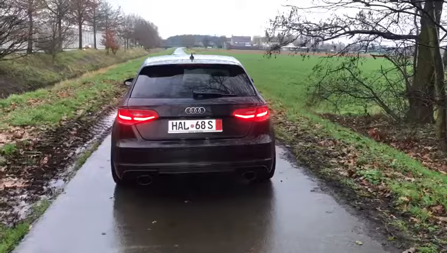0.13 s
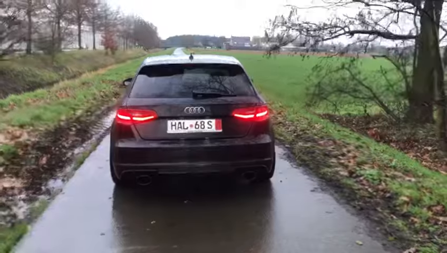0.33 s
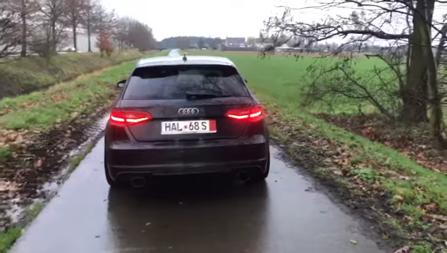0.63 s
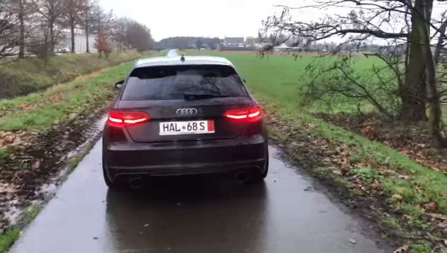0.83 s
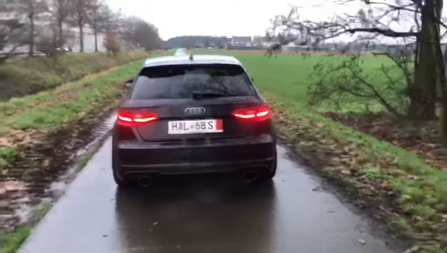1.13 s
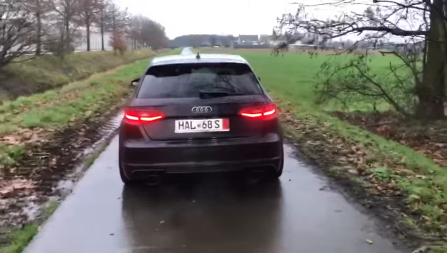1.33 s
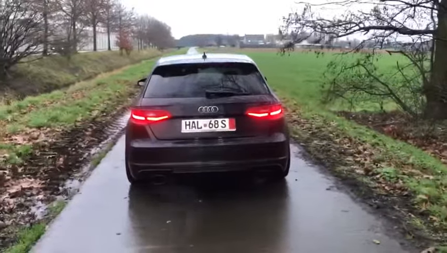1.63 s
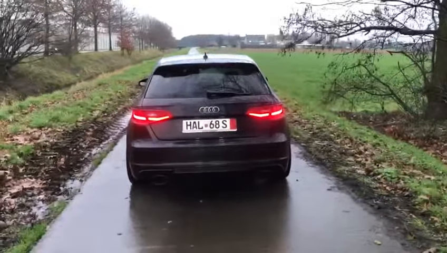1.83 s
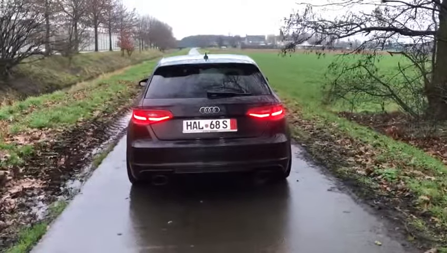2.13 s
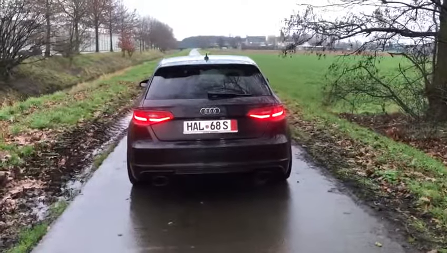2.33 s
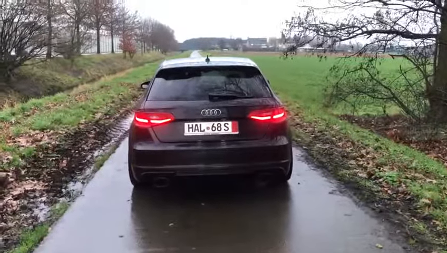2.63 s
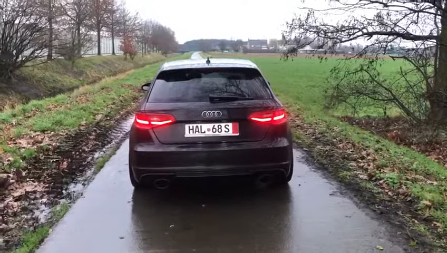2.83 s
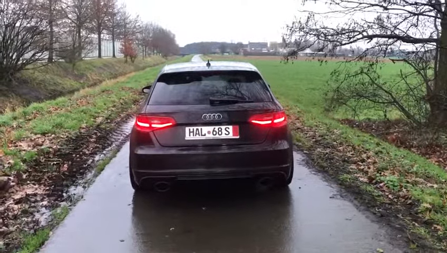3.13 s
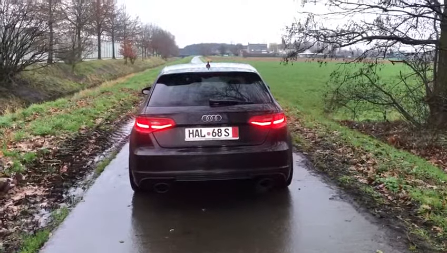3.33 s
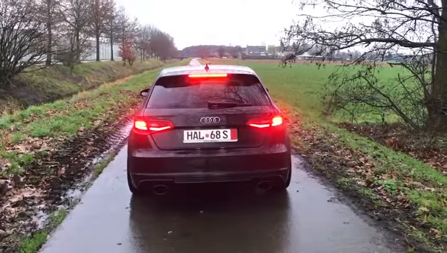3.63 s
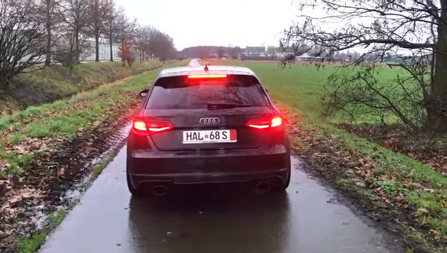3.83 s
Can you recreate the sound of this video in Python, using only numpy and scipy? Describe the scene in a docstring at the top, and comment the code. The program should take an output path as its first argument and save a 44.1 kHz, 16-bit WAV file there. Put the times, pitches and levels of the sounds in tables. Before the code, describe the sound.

A four-cylinder car with a sports exhaust idles softly, then revs three times, each higher blip ending in pops; the revs sink with a drone. Open wet lane, microphone a few metres behind.

```python
"""A four-cylinder car with a sports exhaust idles, then is blipped three times, heard from behind on an open lane.
Each firing drives the exhaust: a deep boom, a throaty body, a bark and, on throttle, rasping gas and sizzle
in the ringing tailpipes. Mostly around the top of each blip the exhaust pops; a tone drones as the revs sink.
Behind it are scattered echoes, an airy engine hiss, one faint tick and steady outdoor noise.
All of it is made from timed pulses, filtered noise and one sine."""
import sys
import numpy as np
from scipy import signal
from scipy.fft import rfft, irfft
from scipy.io import wavfile

SR = 44100
rng = np.random.default_rng(int(sys.argv[2]) if len(sys.argv) > 2 else 0)


def persist_wave(psi):
    """Save psi, clipped to +-1, as 16-bit WAV."""
    counts = np.round(np.clip(psi, -1, 1) * 32767).astype(np.int16)
    wavfile.write(sys.argv[1], SR, np.atleast_2d(counts).T)


N = 176400
TIME = np.arange(N) / SR  # seconds


def undb(db):
    """Turn decibels into gain."""
    return 10 ** (np.asarray(db) / 20)


def curve(rows):
    """Join the (seconds, value) rows of a control by straight lines."""
    return np.interp(TIME, *np.array(rows).T)


def unit(x):
    """Scale to rms 1."""
    return x / np.sqrt(np.mean(x ** 2))


def colour(x, tone, rings=(), size=16384):
    """Filter through (Hz, dB) points with optional resonant peaks, with no sound ahead of its cause."""
    f = np.maximum(np.arange(size // 2 + 1) * SR / size, 1)
    hz, db = np.array(tone).T
    gain_db = np.interp(np.log(f), np.log(hz), db)
    # beyond the end points the response falls further
    above = np.maximum(np.log(f / hz[-1]), 0)
    below = np.minimum(np.maximum(np.log(hz[0] / f), 0), 1)
    gain_db -= 20 * (above + below)
    for centre, width, peak_db in rings:
        gain_db += peak_db / (1 + (2 * (f - centre) / width) ** 2)
    # folding the cepstrum gives the minimum-phase response
    cepstrum = irfft(np.log(undb(gain_db)))
    cepstrum[1:size // 2] *= 2
    cepstrum[size // 2 + 1:] = 0
    response = irfft(np.exp(rfft(cepstrum)))
    return signal.fftconvolve(x, response)[:N]


def clicks(times, sizes, count=8):
    """Place band-limited impulses at exact times, even between samples."""
    at = times[:, None] * SR
    index = np.floor(at).astype(int) + np.arange(1 - count, count + 1)
    shape = np.sinc(index - at) * np.sinc((index - at) / count)
    return np.bincount(np.clip(index, 0, N).ravel(), (sizes[:, None] * shape).ravel(), N + 1)[:N]


def even(x, phase):
    """Hold rms near 1 over every few firings, so that a level curve sets the loudness."""
    samples = np.arange(N)
    hi = np.interp(phase + 1, phase, samples)
    lo = np.interp(phase - 1, phase, samples)
    power = x ** 2
    for _ in range(2):
        total = np.cumsum(power)
        power = (np.interp(hi, samples, total) - np.interp(lo, samples, total)) / (hi - lo)
    return x / np.sqrt(power + 1e-18)


# Engine speed. Each row: time in seconds, firings per second.
SPEED = [(0.0, 23.0), (0.36, 23.36), (0.47, 20.69), (0.64, 29.45), (0.73, 38.06), (0.8, 49.71),
         (0.92, 67.43), (0.97, 66.5), (1.0, 64.9), (1.23, 60), (1.348, 63.5), (1.468, 77.6), (1.626, 103.6),
         (1.78, 131.5), (1.848, 136.6), (1.9, 132.8), (2.42, 113.8), (2.52, 117.5), (2.608, 123.3),
         (2.68, 130.7), (2.78, 134), (3, 127.4), (3.5, 110.3), (3.75, 101.4), (4, 93.8)]
# How far the throttle is open. Each row: time in seconds, opening from 0 to 1.
THROTTLE = [(.57, 0.14), (.61, 0.96), (.95, 0.68), (1.0, 0.1), (1.3, 0.1), (1.45, 0.66), (1.82, 1),
            (1.89, 0), (2.54, .05), (2.68, 1), (2.86, 0.64), (3.02, 0.2)]
FIRST_PHASE = .678  # firings already counted at the start


def engine():
    """Add up the engine speed into a running count of firings, and follow the throttle."""
    hz, throttle = curve(SPEED), curve(THROTTLE).clip(0, 1)
    phase = FIRST_PHASE + np.cumsum(hz) / SR
    return hz, throttle, phase


# Strength of each cylinder in the boom. One value per cylinder, in dB.
CYLINDERS_LOW_DB = [.3, 0.091, .2, -0.042]
# Strength of each cylinder in the high pulses at full throttle. One value per cylinder, in dB.
CYLINDERS_HIGH_DB = [1.5, -0.053, 2.9, -2.5]
# Unequal pipe runs shift the high pulses, at full throttle. One delay per cylinder, in seconds.
STAGGER_S = [.00018, -.00012, .00005, -.00016]
# How raggedly the cylinders fire, roughest in the burbles around the top of each blip.
# Each row: time in seconds, amount from 0 to 1.
RAGGED = [(.95, 0.03), (.98, 1), (1.3, 0.58), (1.4, 0.2), (1.82, 0), (1.845, 1), (1.875, 0.2), (2.72, 0.32),
          (2.75, 1), (2.88, 1), (2.98, 0.64), (3.03, 0.46)]
RAGGED_DB, RAGGED_S = 3.5, .0003  # random spread at amount 1: boom level, timing
SCATTER_DB, JITTER_S = 1, .00002  # base spread of level and timing, scaled by throttle below
COAST_LIMP_DB, LIMP_ABOVE_HZ = 15, 96  # off-throttle drop of every other high pulse, above this firing rate


def firings(hz, throttle, phase):
    """Each cylinder fires in turn; load and coasting make the low, middle and high pulses uneven."""
    number = np.arange(1, int(phase[-1]) + 1)
    times, cylinder = np.interp(number, phase, TIME), number % len(STAGGER_S)
    load = np.interp(times, TIME, throttle)
    fast = np.interp(times, TIME, curve(RAGGED).clip(0, 1))
    ragged = fast
    jitter, scatter, ragged_time, ragged_level = rng.standard_normal((len(times), 4)).T
    times = times + JITTER_S * jitter * (1 + 2 * load) + RAGGED_S * ragged * ragged_time
    fast = np.interp(times, TIME, hz) > LIMP_ABOVE_HZ

    scatter_db = SCATTER_DB * scatter * (0.14 + load)
    stagger = np.array(STAGGER_S)[cylinder] * load
    low_db = np.array(CYLINDERS_LOW_DB)[cylinder] + scatter_db + RAGGED_DB * ragged * ragged_level
    uneven_db = np.array(CYLINDERS_HIGH_DB)[cylinder] * load + 2 * scatter_db
    # weakening every other pulse gives half-order lines
    limp_db = COAST_LIMP_DB * (1 - load) * (number % 2) * fast
    low = clicks(times + 0.68 * stagger, undb(low_db))
    middle = clicks(times + 0.1 * stagger, undb(.5 * uneven_db - .35 * limp_db))
    high = clicks(times + stagger, undb(uneven_db - limp_db))
    return low, middle, high


PUFF_S, PUFF_RISE_S = 0.0048, 0.0005  # time constants of a puff's decay and rise
PUFF_DEPTH = 0.95  # swing of the gas at full throttle, 0-1


def gas_puffs(high, throttle):
    """Each firing pushes a puff of gas that rises fast and dies away; open throttle deepens the swing."""
    age = TIME[:SR // 20]
    shape = np.exp(-age / PUFF_S) * (1 - np.exp(-age / PUFF_RISE_S))
    puff = signal.fftconvolve(high, shape)[:N]
    depth = PUFF_DEPTH * throttle ** 0.45
    return 1 - depth + depth * puff


def gas(gate, phase, tone, rings=()):
    """Turbulent gas: noise that surges with each firing, coloured by the exhaust."""
    return even(colour(gate * rng.standard_normal(N), tone, rings), phase)


def region(pulses, flow, tone, gas_db, rings=()):
    """One region of the exhaust: pressure pulses and turbulent gas pass through the same response."""
    gate, throttle, phase = flow
    share = undb(np.interp(throttle, [0, 1], gas_db))  # gas against pulses
    tonal = even(colour(pulses, tone, rings), phase)
    return (tonal + share * gas(gate, phase, tone, rings)) / np.hypot(1, share)


# Response of the boom. Each row: frequency in Hz, relative gain in dB.
BOOM_TONE = [(25, -38.5), (55, -13.5), (80, -1.5), (100, 7), (120, 11.5), (138, 0), (165, 1), (200, -27.5),
             (260, -46.5)]
# Loudness of the boom. Each row: time in seconds, level in dB.
BOOM = [(0, -34.5), (.25, -31.5), (.38, -39), (.415, -30), (.47, -38), (.53, -35), (.59, -29.5),
        (.69, -16.5), (.9, -9), (.98, -11), (1.04, -16), (1.1, -13), (1.23, -10), (1.32, -19),
        (1.44, -18.5), (1.55, -12.5), (1.68, -13.5), (1.78, -7), (1.83, -9.5), (1.853, -23), (1.878, -4.5),
        (1.95, -7.5), (2.03, -6.5), (2.38, -9.5), (2.43, -16), (2.51, -11.5), (2.61, -24.5), (2.68, -14),
        (2.72, -9), (2.755, -35.5), (2.81, -14), (2.92, -18.5), (2.97, -28), (3.01, -11.5), (3.07, -14),
        (3.2, -10), (3.45, -10.5), (3.66, -17), (4, -17)]


def boom(low, flow):
    """The low pulses drive the deepest region, with only a little gas."""
    return region(low, flow, BOOM_TONE, gas_db=(-36, -24)) * undb(curve(BOOM))


# Response of the throaty body. Each row: frequency in Hz, relative gain in dB.
BODY_TONE = [(120, -37.5), (165, -3), (200, 4), (245, 8), (285, 4.5), (335, 9), (385, 2), (440, -16.5),
             (560, -31.5)]
# Gas against the pulses in the body: dB off throttle, then dB at full throttle.
BODY_GAS_DB = (-11, -17)
# Loudness of the body. Each row: time in seconds, level in dB.
BODY = [(0, -43.5), (.3, -45), (.38, -47), (.41, -42), (.48, -51), (.59, -45), (.62, -32), (.67, -23),
        (.9, -16), (.96, -29), (1.02, -30.5), (1.21, -27.5), (1.25, -18.5), (1.32, -27), (1.4, -17.5),
        (1.49, -12), (1.56, -15), (1.63, -10), (1.72, -8.5), (1.82, -17), (1.88, -25), (1.97, -24),
        (2.15, -36.5), (2.35, -31.5), (2.44, -24.5), (2.52, -30.5), (2.61, -20.5), (2.71, -20),
        (2.78, -22.5), (2.95, -30.5), (3.08, -30), (3.33, -32), (3.5, -25.5), (3.72, -34), (4, -22)]


def body(middle, flow):
    """The middle pulses and some gas sound through the region above the boom."""
    return region(middle, flow, BODY_TONE, BODY_GAS_DB) * undb(curve(BODY))


# Reflections inside the silencer. Each row: delay in seconds, gain as a plain factor.
BOUNCES = [(0, 0.79), (.0035, 0.71), (.0069, .5), (.0108, 0.4)]
# Response of the bark. Each row: frequency in Hz, relative gain in dB.
BARK_TONE = [(330, -36), (440, -8), (520, 4), (570, -4), (630, 0.5), (740, 0.5), (840, -14.5), (900, -15.5),
             (1000, -42), (1500, -56)]
# Resonances of the silencer. Each row: centre in Hz, width in Hz, added peak in dB.
BARK_RINGS = [(565, 28, 4.3), (722, 68, 4), (909, 13, 17)]
# Gas against the pulses in the bark: dB off throttle, then dB at full throttle.
BARK_GAS_DB = (-9, -5)
# Loudness of the bark. Each row: time in seconds, level in dB.
BARK = [(0, -59), (.59, -59), (.67, -36.5), (.8, -26.5), (.94, -18.5), (1.0, -32), (1.19, -33.5),
        (1.26, -31), (1.33, -35.5), (1.46, -19), (1.7, -18.5), (1.82, -15.5), (1.9, -26.5), (2.04, -27.5),
        (2.3, -32.5), (2.55, -30), (2.62, -28.5), (2.71, -17), (2.735, -26.5), (2.8, -25.5), (2.93, -23.5),
        (3.03, -33), (3.35, -30.5), (3.58, -28.5), (3.72, -34), (4, -34.5)]


def bark(high, flow):
    """The high pulses bounce inside the silencer and excite its resonances."""
    bounced = sum(gain * np.interp(TIME - delay, TIME, high) for delay, gain in BOUNCES)
    return region(bounced, flow, BARK_TONE, BARK_GAS_DB, BARK_RINGS) * undb(curve(BARK))


# Rings of the tailpipes, shared with the sizzle and pops. Each row: centre in Hz, width in Hz, added peak in dB.
RINGS = [(1052, 50, 7), (1315, 60, 8), (1545, 50, 6), (1890, 120, 6), (2250, 60, 6), (3700, 350, 2)]
# Response of the rasp. Each row: frequency in Hz, relative gain in dB.
RASP_TONE = [(500, -31), (850, -2.5), (1050, -4), (1400, -3), (1900, -5), (2350, -8.5), (2800, -19.5),
             (3500, -39.5), (5000, -69.5)]
# Loudness of the rasp. Each row: time in seconds, level in dB.
RASP = [(0, -54), (.595, -53.5), (.615, -42.5), (.66, -36), (.89, -32), (.935, -26), (1.0, -43.5),
        (1.34, -45), (1.5, -28.5), (1.679, -23.5), (1.82, -24), (1.85, -33), (1.93, -44), (2.301, -48),
        (2.56, -48.5), (2.71, -27), (2.735, -37.5), (2.881, -42), (2.929, -40), (3.001, -44), (3.5, -45),
        (3.75, -50.5), (4, -49)]


def rasp(high, flow):
    """Gas outweighs the pulses as it tears through the ringing tailpipes."""
    return region(high, flow, RASP_TONE, gas_db=(4, 7), rings=RINGS) * undb(curve(RASP))


# Response of the sizzle before warming. Each row: frequency in Hz, relative gain in dB.
SIZZLE_TONE = [(2400, -34), (3150, -11), (3650, 5.5), (4200, -13.5), (4800, -25), (5700, -12.5),
               (7000, -34), (9000, -43), (12000, -37.5)]
# Loudness of the sizzle. Each row: time in seconds, level in dB.
SIZZLE = [(0, -73.5), (.59, -63), (.615, -53), (.655, -41), (.8, -40.5), (.95, -45), (1.0, -58.5),
          (1.2, -53), (1.31, -60), (1.46, -43), (1.66, -36.5), (1.87, -46.5), (1.96, -54.5), (2.57, -54.5),
          (2.7, -40), (2.79, -56), (3.0, -58), (4, -57.5)]
HOT_RATIO, WARMING_S = 1.117, (1, 2.8)  # hot pitch against cool; start and end of warming


def sizzle(flow):
    """Hot gas raises the tailpipe sizzle: a cool, ringing noise crossfades into a higher one."""
    gate, _, phase = flow
    heat = np.interp(TIME, WARMING_S, [0, 1])
    hot_tone = [(f * HOT_RATIO, db) for f, db in SIZZLE_TONE]
    cool = np.sqrt(1 - heat) * gas(gate, phase, SIZZLE_TONE, RINGS)
    hot = np.sqrt(heat) * gas(gate, phase, hot_tone)
    return (cool + hot) * undb(curve(SIZZLE))


# Loudness of the drone that sings out while the revs sink. Each row: time in seconds, level in dB.
SINGING = [(1.85, -64.5), (1.93, -32.5), (2.04, -28.5), (2.3, -29), (2.42, -33.5), (2.65, -47), (3.0, -37),
           (3.2, -27.5), (3.5, -35.5), (3.7, -45), (4, -42)]
SINGING_ORDER = 4.5  # cycles per firing


def singing(phase):
    """A sine locked to the firings, midway between two of their harmonics, follows the revs."""
    tone = np.sqrt(2) * np.sin(2 * np.pi * SINGING_ORDER * phase)
    return tone * undb(curve(SINGING)) * (TIME > SINGING[0][0])


def exhaust():
    """Firing pulses and the gas puffs behind them sound through five regions, plus the singing tone."""
    hz, throttle, phase = engine()
    low, middle, high = firings(hz, throttle, phase)
    flow = gas_puffs(high, throttle), throttle, phase
    pulsed = boom(low, flow) + body(middle, flow) + bark(high, flow) + rasp(high, flow)
    return pulsed + sizzle(flow) + singing(phase)


# Response of the pops. Each row: frequency in Hz, relative gain in dB.
POP_TONE = [(50, -21.5), (110, 10), (300, 10), (430, -7), (600, 12.5), (950, -15.5), (1400, -8.5),
            (2200, -25), (3000, -34.5), (4000, -29), (7000, -45.5), (12000, -77.5)]
# The exhaust pops. Each row: start in seconds, peak level in dB.
POPS = [(0.92, -3), (.937, -7), (0.951, -4.5), (1.242, -21.5), (1.78, -6), (1.824, -5), (1.843, -4),
        (2.748, -3), (2.78, -3), (2.837, -11), (2.92, -14)]
POP_DECAY_S, POP_GAS_DB = .005, -18  # fade of the gas burst; its level against the spike before filtering


def pops():
    """Unburnt fuel goes off in the pipe: a pressure spike and a short burst of gas."""
    out = np.zeros(N)
    for start, db in POPS:
        age = TIME - start
        burst = rng.standard_normal(N) * (age > 0) * np.exp(-np.abs(age) / POP_DECAY_S)
        spike = clicks(np.array([start]), np.ones(1))
        bang = colour(spike + undb(POP_GAS_DB) * burst, POP_TONE, RINGS)
        out -= undb(db) * bang / np.abs(bang).max()
    return out


ECHO_DB, ECHO_T60_S = -19, 0.91  # echo level before the bass cut; time to fall by 60 dB


def lane(x):
    """Trees and ditch scatter faint echoes, a fading noise tail without the deep bass."""
    age = TIME[:SR // 2]
    tail = rng.standard_normal(len(age)) * undb(-60 * age / ECHO_T60_S) * (age > .008)
    wet = signal.fftconvolve(x, tail / np.linalg.norm(tail))[:N]
    bass_cut = signal.butter(4, 300, "high", fs=SR, output="sos")
    return x + undb(ECHO_DB) * signal.sosfilt(bass_cut, wet)


# Response of the airy hiss. Each row: frequency in Hz, relative gain in dB.
HISS_TONE = [(1000, -12), (2200, -4), (3000, 6), (4100, -9.5), (4900, -2), (7000, -7), (9000, -7.5),
             (12000, -17.5)]
# Loudness of the hiss. Each row: time in seconds, level in dB.
HISS = [(0, -76), (.6, -66.5), (.9, -52), (1.03, -58), (1.3, -60), (1.6, -51.5), (1.88, -48.5),
        (2.0, -52.5), (2.36, -57), (2.43, -62), (2.58, -59.5), (2.63, -53.5), (3.0, -58), (3.35, -54.5),
        (4, -56.5)]


def engine_hiss():
    """The engine's airy hiss is filtered noise that follows a level curve."""
    return unit(colour(rng.standard_normal(N), HISS_TONE)) * undb(curve(HISS))


TICK_S, TICK_DB, TICK_DECAY_S = 0.35, -49.5, 0.002  # start, starting noise level, fade


def tick():
    """One tiny bright tick during the idle, a noise burst that fades at once."""
    age = TIME - TICK_S
    burst = rng.standard_normal(N) * (age > 0) * np.exp(-np.abs(age) / TICK_DECAY_S)
    return undb(TICK_DB) * burst


# Colour of the engine-bay and outdoor noise. Each row: frequency in Hz, relative density in dB per Hz.
FLOOR = [(25, -10.5), (100, -4.5), (300, 0.5), (500, -7.5), (1000, -10.5), (1800, -19.5), (2800, -25),
         (3800, -21.5), (5000, -29.5), (8000, -39.5), (12000, -45.5)]
FLOOR_DB = -48  # rms level


def outdoor_floor():
    """Steady engine-bay and outdoor noise, coloured and held at one level."""
    return unit(colour(rng.standard_normal(N), FLOOR)) * undb(FLOOR_DB)


def scene():
    """Exhaust and pops with their echoes, then hiss and tick over a quiet floor."""
    return (lane(exhaust() + pops()) + engine_hiss() + tick() + outdoor_floor())[None]


CEILING, TOP_HZ = .93, 12100  # limit for the peaks before the top cut; edge of the top cut


def record(dry):
    """Fade in and out, round the loudest peaks and cut the top."""
    fade = np.interp(TIME, [.03, .04, TIME[-1] - .004, TIME[-1]], [0, 1, 1, 0])
    rounded = fade * dry / (1 + (dry / CEILING) ** 6) ** (1 / 6)
    top_cut = signal.ellip(10, .2, 80, TOP_HZ, fs=SR, output="sos")
    return signal.sosfilt(top_cut, rounded)


dry = scene()
out = record(dry)
persist_wave(out)
```